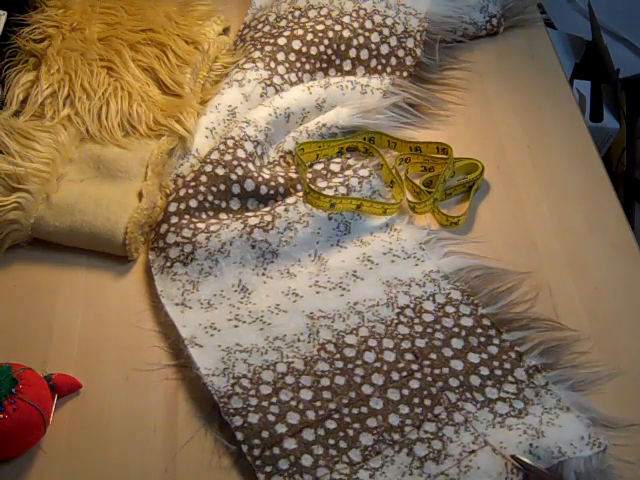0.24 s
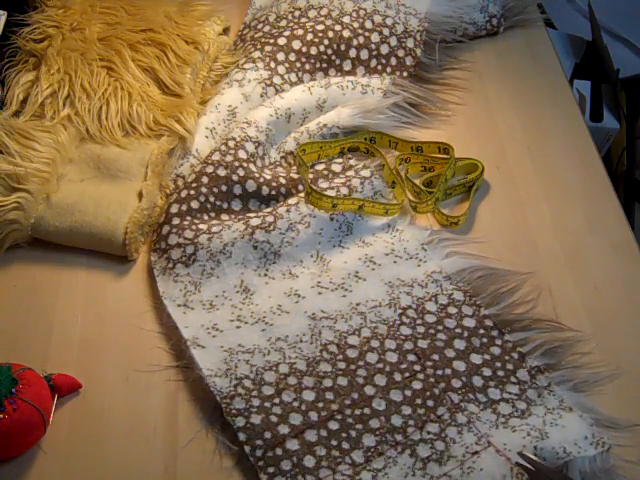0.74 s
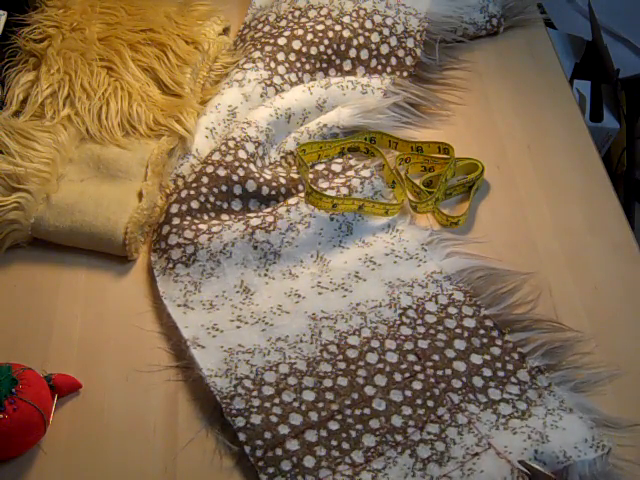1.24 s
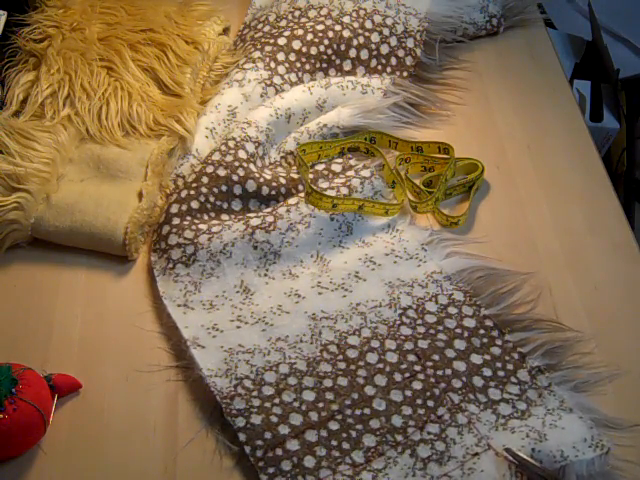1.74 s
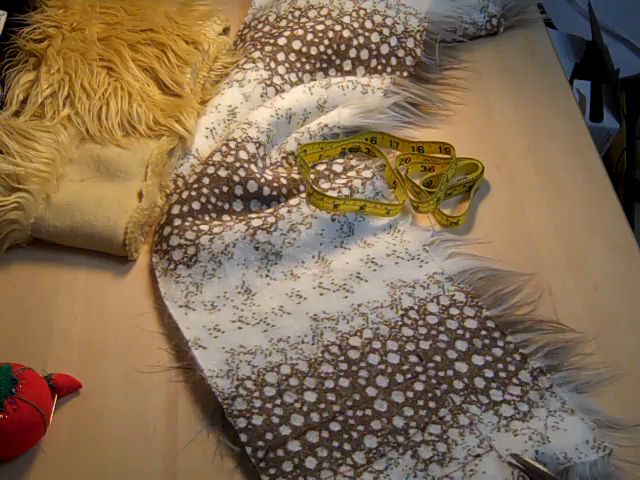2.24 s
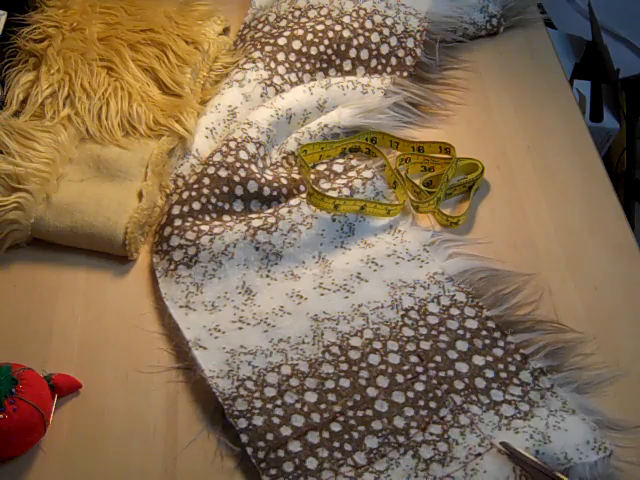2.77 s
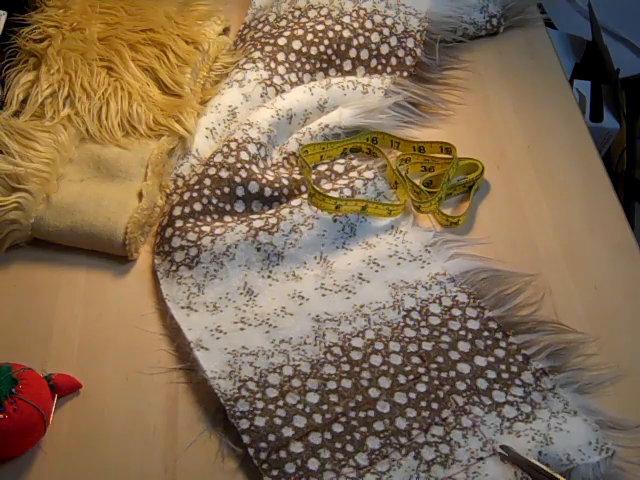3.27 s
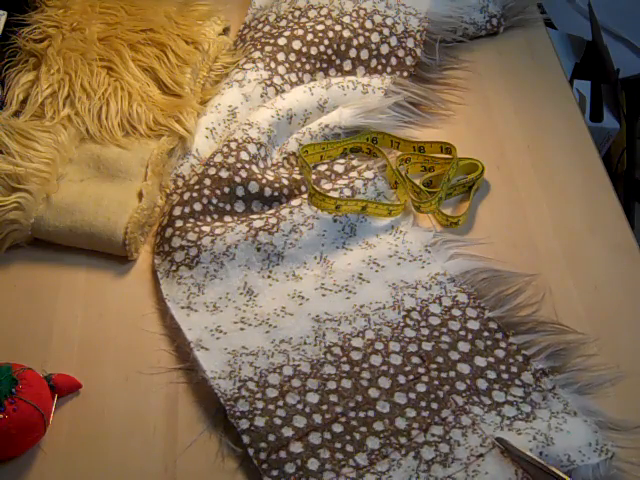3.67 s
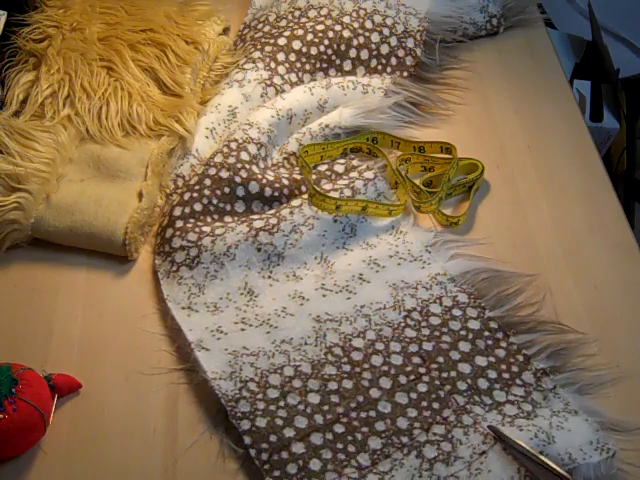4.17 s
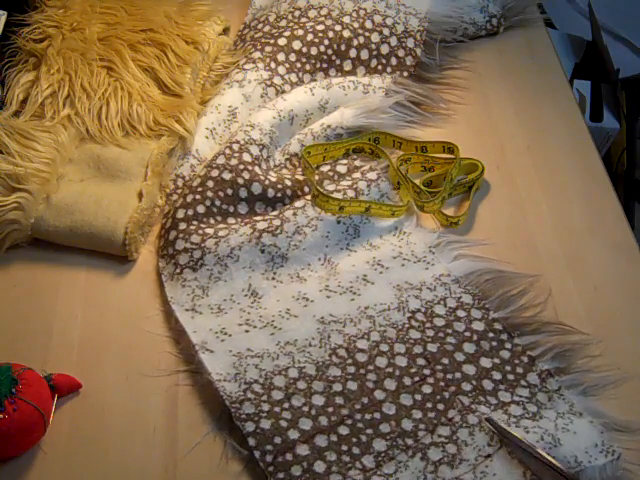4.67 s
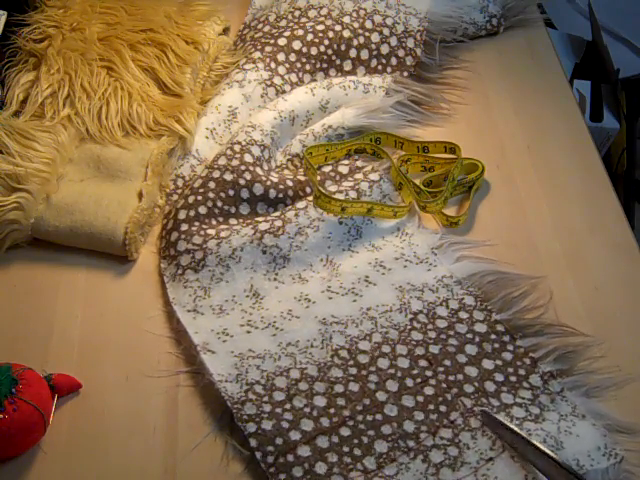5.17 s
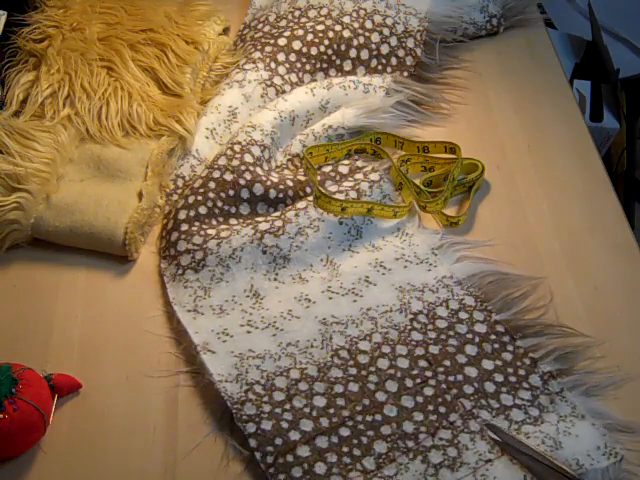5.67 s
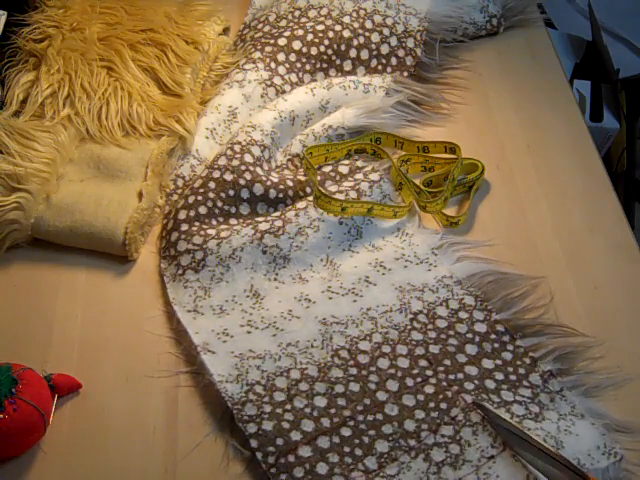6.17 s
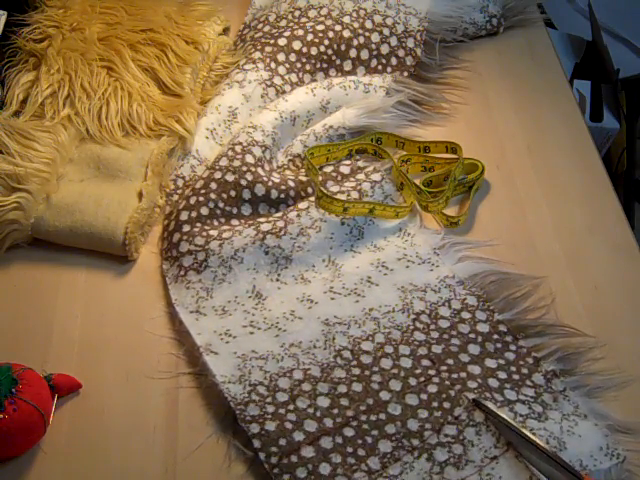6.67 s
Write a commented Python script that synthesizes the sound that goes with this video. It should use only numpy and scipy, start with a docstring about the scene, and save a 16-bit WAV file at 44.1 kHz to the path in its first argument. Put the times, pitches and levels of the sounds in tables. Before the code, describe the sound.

Close, bright metallic scissor snips, each a gritty shearing crunch with a hard snap or softer bite, above quiet blowing air and slight hiss.

```python
"""A small room with a worktable, on which scissors snip through thick fabric.
Parting threads shake the resonant blades; in each snap a first touch, a main contact and a rebound strike them.
Dense grains make the scrape of opening blades and the faint cloth rustle; short knocks sound the table.
An appliance blows shaped noise with a faint whistle and hums in wavering tones; two small microphones each
add a treble resonance, and their preamplifier adds hiss."""
import sys
import numpy as np
from scipy import signal
from scipy.io import wavfile

SR = 44100
rng = np.random.default_rng(int(sys.argv[2]) if len(sys.argv) > 2 else 0)


def wav_record(signal):
    """Record a signal, one row per channel, as 16-bit PCM in the file named by sys.argv[1]."""
    frames = np.transpose(np.atleast_2d(signal))
    bounded = np.clip(frames, -1, 1)
    # unit amplitude maps onto the largest positive 16-bit level
    quanta = np.round(bounded * 32767).astype(np.int16)
    wavfile.write(sys.argv[1], SR, quanta)


def decibels_to_gain(level_db):
    """Convert a level in decibels to a linear amplitude gain (20 dB per decade)."""
    exponent = np.asarray(level_db, float) / 20
    return 10 ** exponent


N = 304686   # samples

# appliance motor tones: pitch_hz, level_db (rms), waver_db (spread)
MOTOR_TONES = [(58.8, -63.5, .8), (73.5, -56.5, .5), (117.6, -60.5, 2.5), (467, -62, 2.5), (8000, -84, 1.5)]
# spectral density of the blown air, relative: centre_hz, density_db (per Hz)
AIR_SPECTRUM = [(28, -16), (40, -10), (65, -11.5), (95, -6), (146, -6.5), (193, -2.5), (255, -17.5),
                (323, -4), (465, -14.5), (669, -11.5), (1200, -18), (2500, -25.5), (5000, -33)]
# balance of the blown air: centre_hz, left_minus_right_db
AIR_BALANCE = [(60, 5), (240, 0), (940, 1.5), (3720, 5), (14700, 2)]
# correlation of the blown air between the microphones: centre_hz, correlation (-1 to 1)
AIR_LIKENESS = [(60, 0.43), (180, 0.67), (540, 0.75), (1630, 0.19), (4890, 0.078), (14700, -0.02)]
# narrow noisy peaks in the blower sound, with a faint whistle at 4.8 kHz: centre_hz, width_hz, level_db (rms)
AIR_PEAKS = [(198, 45, -61), (313.2, 32, -62), (394, 84, -65), (459.8, 120, -60), (508, 35, -75),
             (4800, 80, -82)]
AIR_DB, HISS_DB = -54.5, -62.5   # rms where each noise is added

# cloth rustling in soft swells: middle_s, length_s, level_db (at the crest)
RUSTLE_SWELLS = [(0.227, 0.2, -71), (0.846, .3, -82), (1.95, 0.63, -78), (2.95, 0.14, -68),
                 (3.598, 0.13, -77.5), (3.852, 0.23, -76), (4.098, 0.13, -68), (4.87, 0.18, -70),
                 (5.8, 0.092, -77), (6.364, 0.18, -65.5)]
RUSTLE_BED_DB = -73

# blades scraping open again: middle_s, level_db (at the crest)
OPENING_STROKES = [(0.78, -42), (2.278, -42.5), (3.432, -47.5), (4.775, -50), (5.368, -41.5)]
# colour of the scrape: centre_hz, width_hz, level_db (relative)
SCRAPE_MODES = [(1320, 250, -13), (2580, 830, -9), (3800, 970, -4), (6300, 3500, -5.5), (9700, 1600, 0),
                (12700, 2800, -5.5)]
OPENING_S = 0.03

# lower blade knocking the table: start_s, level_db (before the table's gain)
TABLE_KNOCKS = [(3.203, -25), (4.583, -23.5), (5.135, -27.5)]
# table top resonance: centre_hz, width_hz, gain_db (for a one-sample knock)
TABLE_MODES = [(635, 37, 30)]

# blades shearing a bunch of threads: start_s, length_ms, drive_db (before SHEAR_GAIN_DB), deep_modes_db
THREAD_BITES = [(0.552, 17, -24.5, -6.5), (.567, 41, -41.5, 9), (2.0505, 14.6, -24, -6.5),
                (2.081, 6, -24, -1), (2.1, 9, -32.5, 4), (3.2007, 7.8, -22, -12), (3.208, 6.8, -24, -9),
                (3.214, 14, -38.5, 8), (3.233, 8.6, -26.5, 1.5), (4.2885, 4.5, -43, 6),
                (4.3456, 5.4, -31.5, -5.5), (4.3777, 8.6, -34, -2.5), (4.533, 5.9, -31.5, 0.5),
                (4.58, 14.7, -24.5, 0), (4.631, 5, -30.5, 3), (5.133, 4, -26, -3.5),
                (5.137, 6.9, -21.5, -4), (5.1625, 6.6, -19, -6), (5.172, 6.7, -33, 8.5),
                (5.18, 6.5, -35.5, 8), (5.195, 3.1, -22, -0.5), (6.703, 6.3, -36, 1.5),
                (6.739, 8.2, -27.5, 1.5), (6.749, 21, -38.5, 3), (6.761, 5.3, -24.5, -8)]
# blade tips catching a few fibres: start_s, drive_db (before SHEAR_GAIN_DB), deep_modes_db
FIBRE_CATCHES = [(0.0592, -60.5, 5), (0.4448, -48, -1), (1.6696, -61, -2), (1.953, -51.5, -10),
                 (1.982, -64, 5.5), (2.446, -56, -6), (3.1477, -58.5, 5), (3.1728, -49, -3),
                 (3.6308, -55, -4), (5.0818, -54.5, 12.5), (5.0903, -59, 12), (5.126, -49, 3),
                 (6.1075, -57.5, -8), (6.268, -59, 3), (6.627, -65.5, 14.5), (6.652, -64, -5),
                 (6.787, -51, -3)]
# metallic 4 kHz ring, damped by the cloth pile to a varying degree: time_s, level_db
METALLIC_RING = [(0, -4), (3.3, -2), (4.2, -8.5), (6.9, -8)]
# blade resonances under shear, deep, middle and high: centre_hz, width_hz, level_db (relative)
DEEP_MODES = [(1400, 520, -26), (1822, 180, -19), (2180, 200, -14), (2640, 390, -13), (3680, 320, -9.5),
              (4800, 450, -4.5), (4860, 680, -2), (5240, 630, -17.5)]
MIDDLE_MODES = [(4150, 240, 0)]
HIGH_MODES = [(7270, 790, -10.5), (8280, 250, 0.5), (9840, 1700, -7.5), (11600, 1100, -12),
              (13300, 1600, -13)]
CATCH_MS, ATTACK_MS, RELEASE_MS = 4, 2.2, 3   # thread resistance builds up, holds, lets go
SHEAR_GAIN_DB, STRIKE_GAIN_DB = 13, 17.5      # radiation of steel shaken by threads, and struck

# blades snapping shut: contact_s, level_db (before STRIKE_GAIN_DB), first_touch_db (against it),
# bright_db (modes above 7 kHz)
BLADE_SNAPS = [(0.5968, 2, -7, .7), (2.105, 4.5, -7.5, -0.6), (3.2446, 0.2, -10, 0.5),
               (5.1988, 2, -4.5, 1.6)]
# blade resonances when struck shut: centre_hz, width_hz, level_db (relative)
SHUT_MODES = [(1096, 700, -23.5), (2190, 500, -16.5), (2880, 350, -9.5), (3560, 380, -14),
              (4600, 480, -4.5), (5640, 1330, -0.5), (6580, 1400, 2), (7520, 800, 3.5), (7953, 900, 0),
              (9760, 460, -3), (11460, 2900, -13.5), (13900, 1800, -22.5)]
FIRST_LEAD_S, REBOUND_S, REBOUND_DB, REBOUND_BRIGHT_DB = .0014, .0017, -12.5, 4

# decay of the diffuse tail: centre_hz, t60_s
ROOM_DECAY = [(1500, 0.28), (3000, 0.3), (6000, 0.26), (11000, 0.23)]
TAIL_DB, EARLY_DB, WALL_ECHO_DB = -11.5, -8, -16
EARLY_T60_S, WALL_ECHO_S = 0.092, 0.01
LEFT_LAG = 4       # samples
SHADOW_HZ = 9700   # the raised cloth screens the right port from the treble of the shearing point

# microphone ports, left then right: resonance_hz, width_hz, added_db (resonant path), treble_cut_hz
MICROPHONE_PORTS = [(7890, 900, 7, 10270), (6240, 670, 11, 5500)]
STOP_HZ = 14450    # stop-band edge


def rms_one(x):
    """Normalisation: the signal is scaled to unit rms."""
    return x / np.sqrt(np.mean(x ** 2) + 1e-20)


def at_hz(points, hz):
    """Interpolation on a logarithmic frequency axis."""
    table_hz, values = np.array(points)[:, :2].T
    return np.interp(np.log(hz), np.log(table_hz), values)


def drift(rate_hz):
    """Low-pass filtered chance: a slow random motion of unit spread."""
    hop = 40   # samples between computed points
    r = np.exp(-2 * np.pi * rate_hz * hop / SR)
    white = rng.standard_normal(N // hop + 2002)
    slow = signal.lfilter([1], [1, -2 * r, r * r], white)[2000:]   # skip the filter's onset
    return np.interp(np.arange(N) / hop, np.arange(len(slow)), rms_one(slow))


def resonance(x, hz, width_hz):
    """Damped oscillator: a two-pole band-pass with unit gain at its peak."""
    r = np.exp(-np.pi * width_hz / SR)
    zeros = np.array([1, 0, -1]) * (1 - r * r) / 2
    poles = [1, -2 * r * np.cos(2 * np.pi * hz / SR), r * r]
    return signal.lfilter(zeros, poles, x + 1e-18)


def body(x, modes):
    """Modal superposition: parallel resonances with alternating signs."""
    return sum((-1) ** k * decibels_to_gain(db) * resonance(x, hz, width) for k, (hz, width, db) in enumerate(modes))


def octave_bands(lowest_hz, count, step):
    """Constant-ratio analysis: adjoining band-passes, step octaves wide, with their centres."""
    edges = lowest_hz * 2 ** (step * np.arange(count + 1))
    return [(np.sqrt(a * b), signal.butter(2, [a, b], "band", fs=SR, output="sos"))
            for a, b in zip(edges, edges[1:])]


def threads(per_s, spread_db):
    """Random impulse process: single grains at chance moments with uneven strength and sign."""
    sizes = decibels_to_gain(spread_db * np.minimum(rng.exponential(1, N), 4)) * rng.choice([-1, 1], N)
    return sizes * (rng.random(N) < per_s / SR)


def swells(rows):
    """Gaussian envelopes: summed bell-shaped gains in time from (middle_s, length_s, level_db)."""
    t = np.arange(N) / SR
    return sum(decibels_to_gain(db) * np.exp(-(2 * (t - s) / length) ** 2) for s, length, db in rows)


def blown_air():
    """Partly correlated noise: shared and opposed parts set the likeness of the sides; narrow peaks add to it."""
    white, air = rng.standard_normal((2, 2, N)), 0
    opposed = np.array([[1], [-1]])
    for k, (hz, band) in enumerate(octave_bands(27.85, count=23, step=1 / 3)):
        mid, side = signal.sosfilt(band, white[k % 2])   # neighbouring bands use separate noise
        alike = np.clip(at_hz(AIR_LIKENESS, hz), -1, 1)
        gain = decibels_to_gain(at_hz(AIR_SPECTRUM, hz) + at_hz(AIR_BALANCE, hz) * opposed / 2)
        air = air + gain * (np.sqrt(1 + alike) * mid + np.sqrt(1 - alike) * side * opposed)
    out = decibels_to_gain(AIR_DB) * rms_one(air)
    for hz, width, db in AIR_PEAKS:
        mid, side = rng.standard_normal((2, N))
        once = resonance(mid + 0.13 * side * opposed, hz, width)
        out = out + decibels_to_gain(db) * rms_one(resonance(once, hz, width))
    return out


def motor_hum():
    """Quasi-periodic tones: sinusoids whose phase and level waver slowly."""
    out = 0
    for hz, db, waver_db in MOTOR_TONES:
        phase = 2 * np.pi * hz * np.arange(N) / SR + 1.1 * drift(0.59) + rng.uniform(0, 2 * np.pi)
        level = np.sqrt(2) * decibels_to_gain(db + waver_db * drift(0.85))
        out = out + level * np.sin(phase + [[.1], [-.1]])   # radians, left and right
    return out


def appliance():
    """Superposition of flow noise and motor tones."""
    return blown_air() + motor_hum()


def rustle():
    """Distributed friction: fine fibres slide over a wide patch in dense bright grains, unlike on each side."""
    grains = [threads(per_s=19000, spread_db=4.5) for side in range(2)]
    bright = signal.sosfilt(signal.butter(2, [5000, 9500], "band", fs=SR, output="sos"), grains)
    return (decibels_to_gain(RUSTLE_BED_DB) + swells(RUSTLE_SWELLS)) * rms_one(bright)


def openings():
    """Sliding friction: steel on steel and cloth gives dense grains, broad in colour."""
    strokes = [(s, OPENING_S, db) for s, db in OPENING_STROKES]
    return swells(strokes) * rms_one(body(threads(per_s=12000, spread_db=5.5), SCRAPE_MODES))


def table_knocks():
    """Impulse response: the lower blade's knocks ring the table top."""
    push = np.zeros(N)
    s, db = np.transpose(TABLE_KNOCKS)
    push[np.round(s * SR).astype(int)] = decibels_to_gain(db)
    return body(push, TABLE_MODES)


def bites():
    """Forced vibration: bursts of parting threads shake the blade modes, a little differently every time."""
    parting, out = threads(per_s=14000, spread_db=2.0), np.zeros(N)
    modes = DEEP_MODES + MIDDLE_MODES + HIGH_MODES
    counts = [len(DEEP_MODES), len(MIDDLE_MODES), len(HIGH_MODES)]
    bursts = THREAD_BITES + [(s, CATCH_MS, db, deep_db) for s, db, deep_db in FIBRE_CATCHES]
    grips = rng.normal(0, 1.5, (len(bursts), len(modes)))   # dB
    for (s, ms, db, deep_db), grip_db in zip(bursts, grips):
        i, n = round(s * SR), round(ms * SR / 1000)
        way_ms = np.arange(n) * 1000 / SR
        resistance = np.minimum(way_ms / ATTACK_MS, (ms - way_ms) / RELEASE_MS)
        stroke = 0.16 + np.minimum(1, resistance)
        drive = decibels_to_gain(db + SHEAR_GAIN_DB) * rms_one(parting[i:i + n] * stroke)
        burst = np.pad(drive, (0, SR // 50))   # room to ring out
        ring_db = np.interp(s, *np.transpose(METALLIC_RING))
        lift_db = np.repeat([deep_db, ring_db, 0], counts) + grip_db
        shaken = [(hz, width, mode_db + lift) for (hz, width, mode_db), lift in zip(modes, lift_db)]
        out[i:i + len(burst)] += body(burst, shaken)
    return out - 0.68 * resonance(out, 6290, 1010)   # the crunch of the threads is weak near 6 kHz


def strike(s, level_db, bright_db):
    """Impact excitation: every contact strikes each blade mode with a strength of its own."""
    out = np.zeros(N)
    for k, (hz, width, db) in enumerate(SHUT_MODES):
        clicks = np.zeros(N)
        spread_db = rng.normal(0, 1.5, len(s))
        strength_db = level_db + db + STRIKE_GAIN_DB + bright_db * (hz > 7000) + spread_db
        clicks[np.round(s * SR).astype(int)] = decibels_to_gain(strength_db)
        out += (-1) ** k * resonance(clicks, hz, width)
    return out


def snaps():
    """Repeated impact: a snap is first touch, main contact and rebound, returned as three signals."""
    s, db, first_db, bright_db = np.transpose(BLADE_SNAPS)
    first = strike(s - FIRST_LEAD_S, db + first_db, bright_db)
    main = strike(s, db, bright_db)
    rebound = strike(s + REBOUND_S, db + REBOUND_DB, bright_db + REBOUND_BRIGHT_DB)
    return [first, main, rebound]


def room(x):
    """Reverberation: near-wall echoes, quick early decay and a banded diffuse tail, unlike at each microphone."""
    t = np.arange(SR // 2) / SR
    noise, tail = rng.standard_normal((3, 2, len(t))), 0
    for hz, band in octave_bands(496, count=9, step=.55):
        tail = tail + signal.sosfilt(band, noise[0]) * decibels_to_gain(-60 * t / at_hz(ROOM_DECAY, hz))
    build_up = np.clip(t / 0.006, 0, 1) ** 3
    early = noise[1] * decibels_to_gain(-60 * t / EARLY_T60_S) * np.sqrt(build_up)
    wall = noise[2] * np.exp(-((t - WALL_ECHO_S) / .0022) ** 2)
    parts = [(tail * build_up, TAIL_DB), (early, EARLY_DB), (wall, WALL_ECHO_DB)]
    answer = sum(decibels_to_gain(db) * h / np.linalg.norm(h, axis=1, keepdims=True) for h, db in parts)
    return signal.fftconvolve(x[None], answer, axes=1)[:, :N]


def scene():
    """Direct and reverberant fields: scissors reach both ports straight and by the room, over the background."""
    background = appliance() + rustle()
    shear = openings() + table_knocks() + bites()
    contacts = snaps()
    shaded = signal.sosfilt(signal.butter(2, SHADOW_HZ, fs=SR, output="sos"), shear)
    left = np.roll(shear + sum(contacts), LEFT_LAG)   # the scissors are nearer the right microphone
    direct = np.array([left, shaded + sum(contacts)])
    # the contacts sound from different points along the blades, so each has its own paths through the room
    reflected = sum(room(source) for source in [shear] + contacts)
    return direct + reflected + background


def band_limit(x):
    """A steep low-pass at the top of the band."""
    return signal.sosfilt(signal.butter(12, 15310, fs=SR, output="sos"), x)


def record(dry):
    """Port resonance and saturation: ports lift treble; the preamplifier hisses, cuts the top, rounds peaks."""
    ports = []
    for x, (hz, width, added_db, cut_hz) in zip(dry, MICROPHONE_PORTS):
        lifted = x + decibels_to_gain(added_db) * resonance(x, hz, width)
        ports.append(signal.sosfilt(signal.butter(2, cut_hz, fs=SR, output="sos"), lifted))
    hiss = signal.lfilter([1], [1, -.3], rng.standard_normal(dry.shape))
    top_cut = signal.cheby2(16, 45, STOP_HZ, fs=SR, output="sos")
    x = signal.sosfilt(top_cut, np.array(ports) + decibels_to_gain(HISS_DB) * rms_one(hiss))
    rounded = x / (1 + x ** 8) ** (1 / 8)   # saturates at full scale
    # the converter softens the overload splash
    smoothing = signal.cheby2(6, 15, STOP_HZ, fs=SR, output="sos")
    return band_limit(signal.sosfilt(smoothing, rounded))


dry = scene()
out = record(dry)
wav_record(out)
```